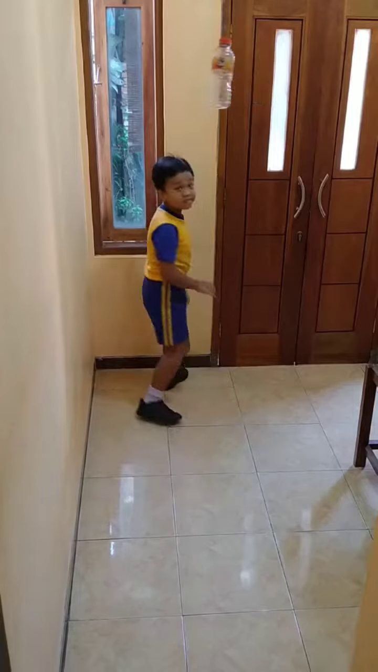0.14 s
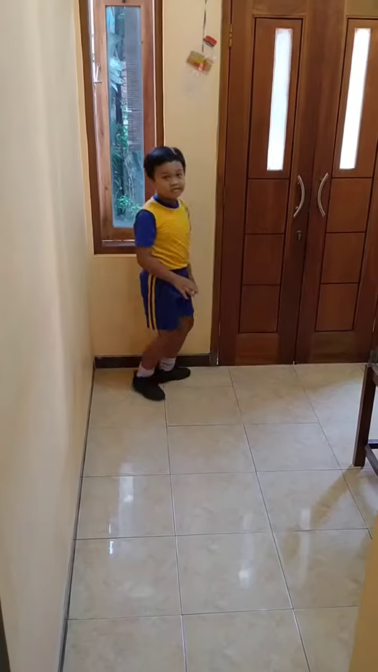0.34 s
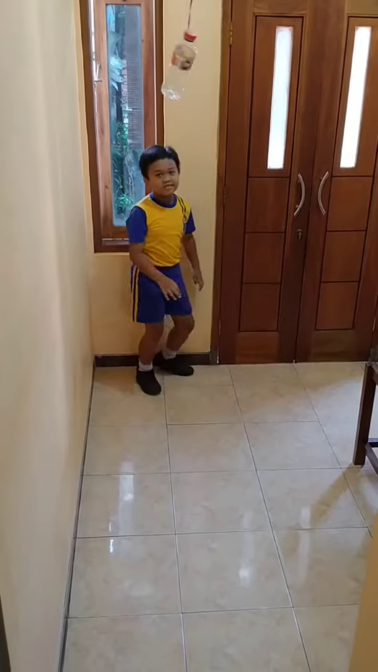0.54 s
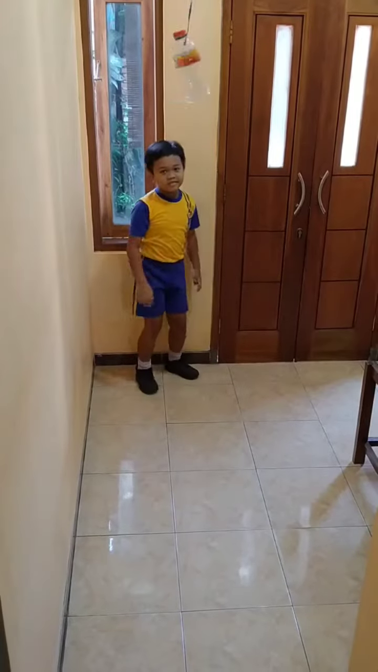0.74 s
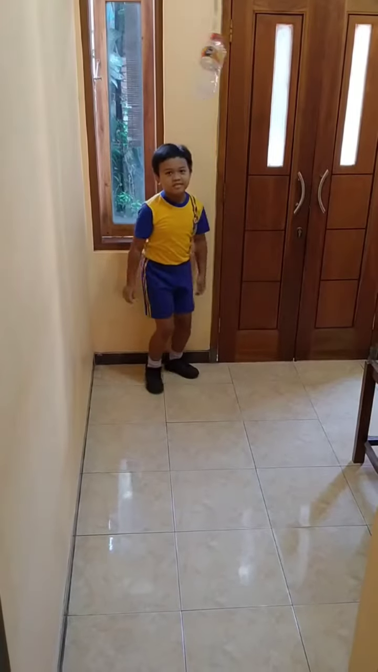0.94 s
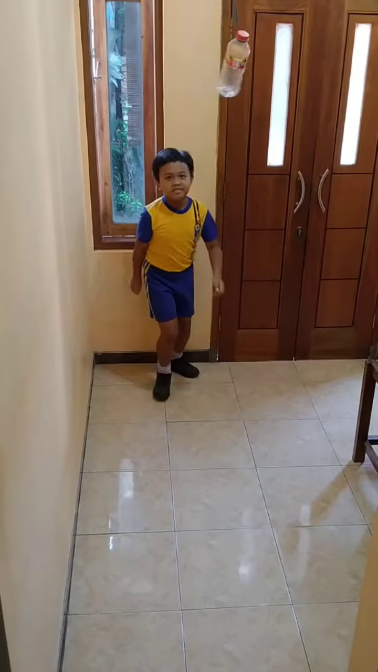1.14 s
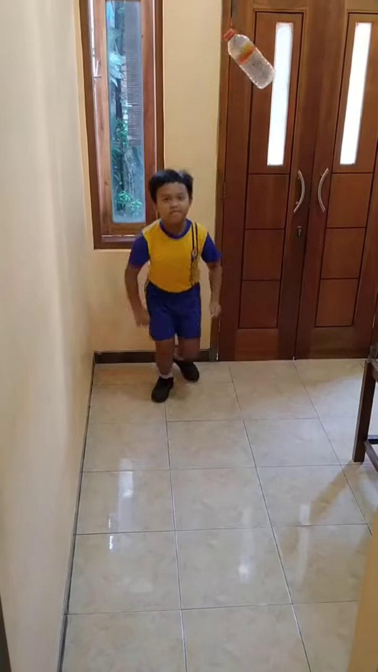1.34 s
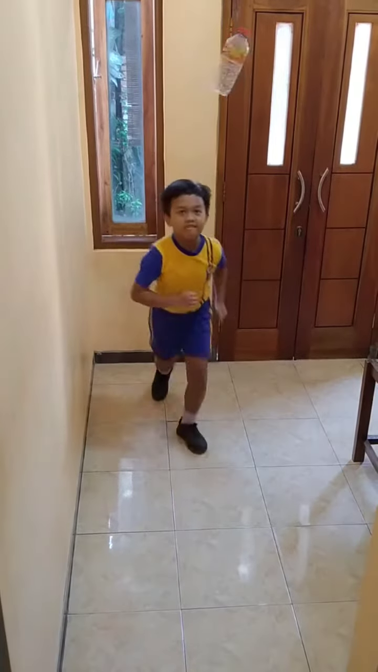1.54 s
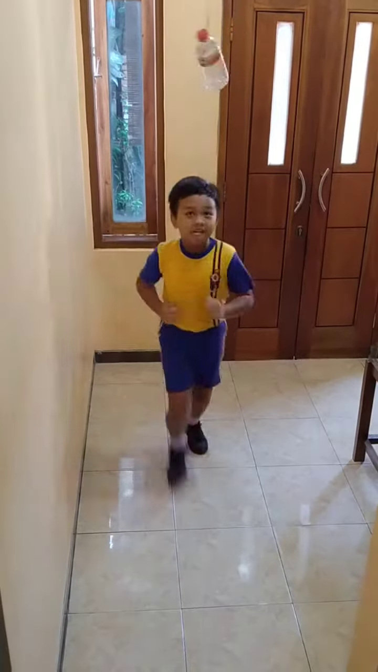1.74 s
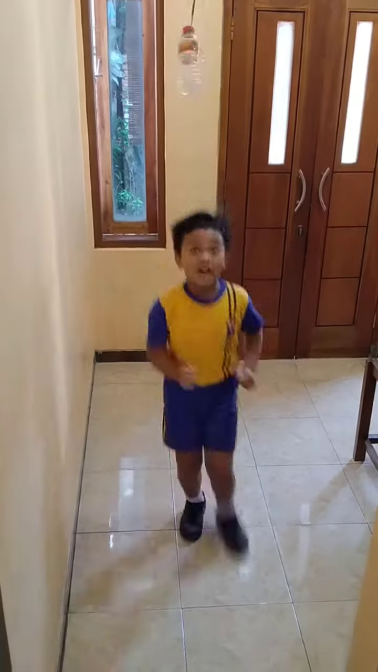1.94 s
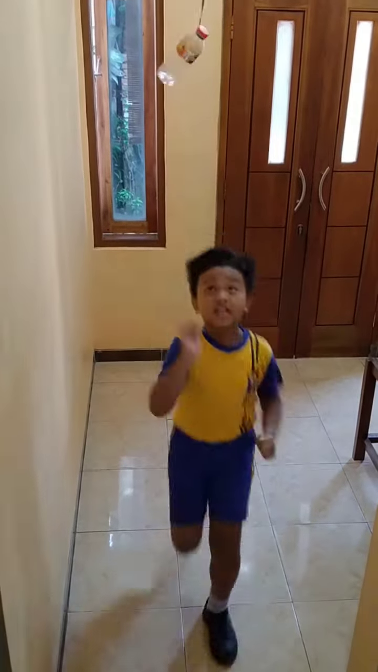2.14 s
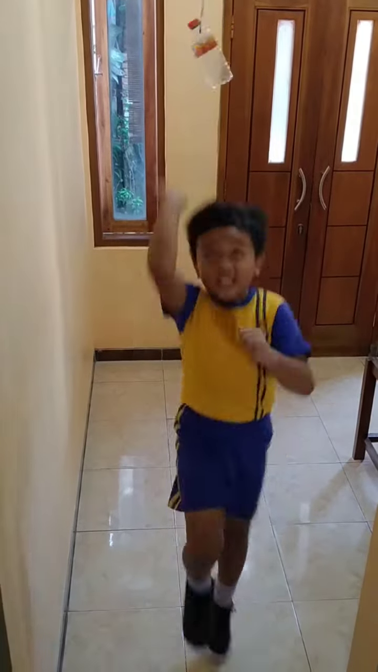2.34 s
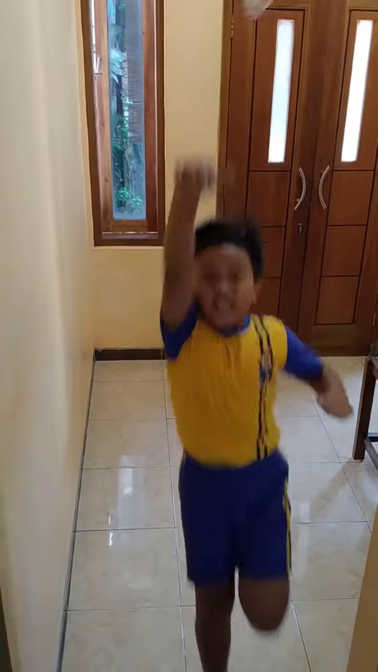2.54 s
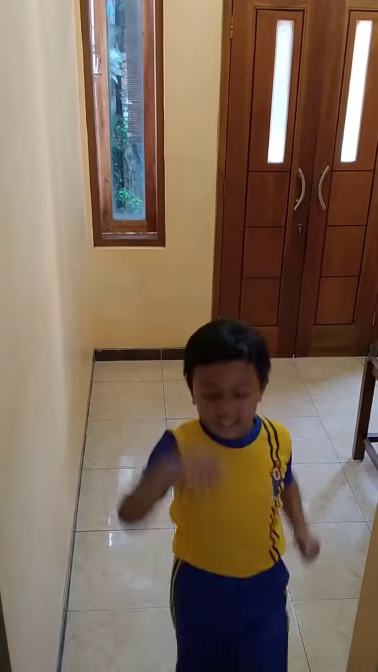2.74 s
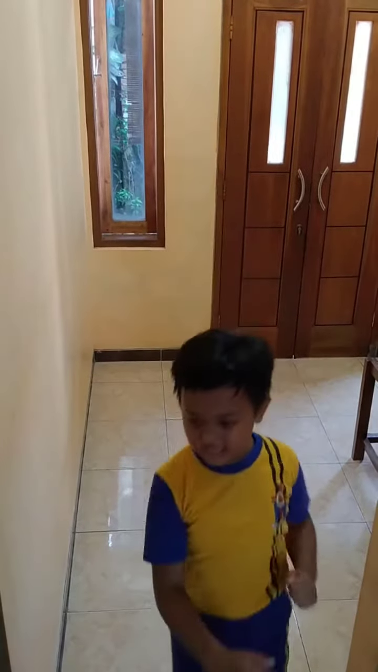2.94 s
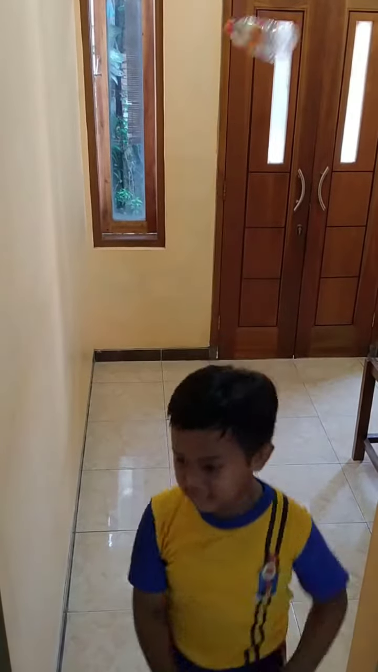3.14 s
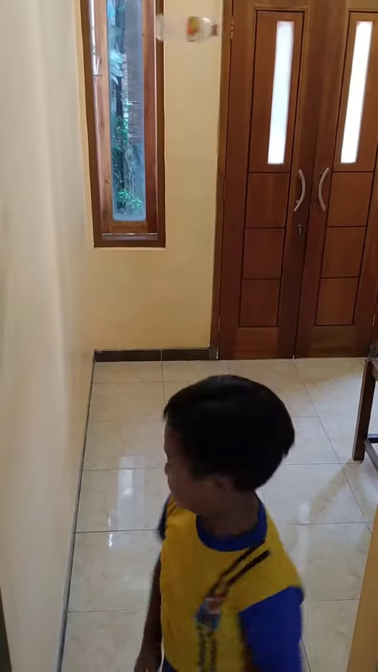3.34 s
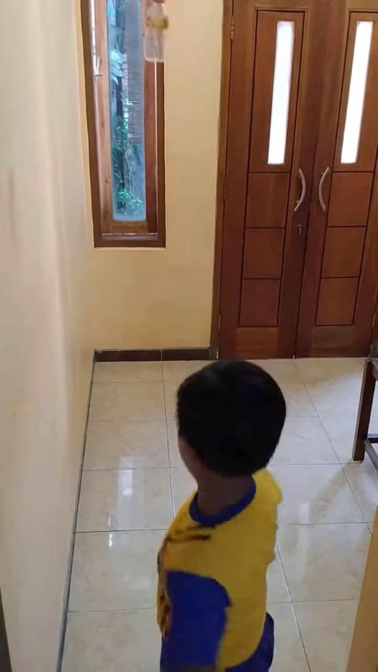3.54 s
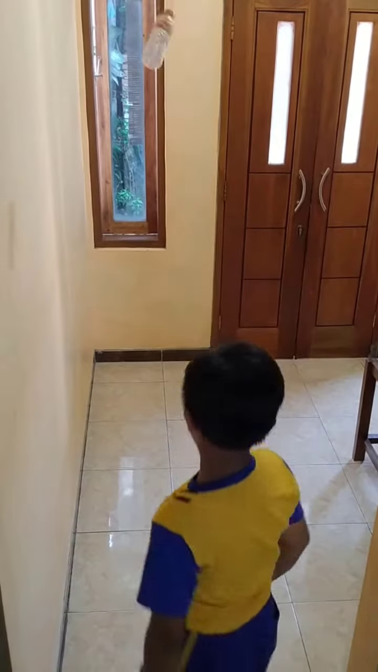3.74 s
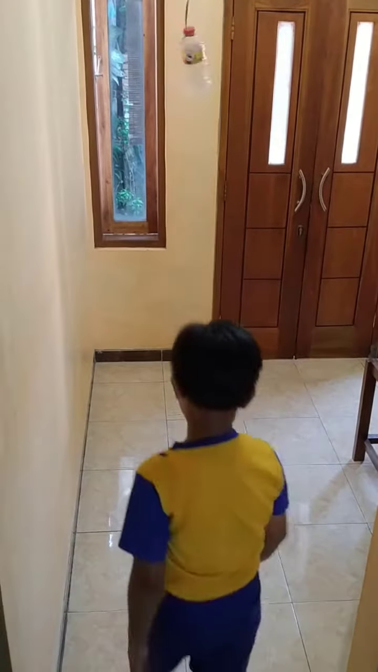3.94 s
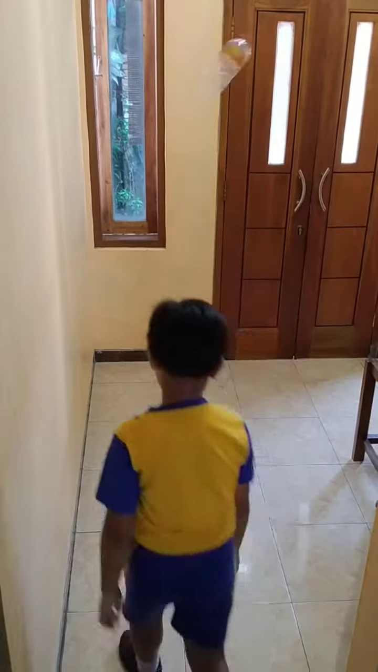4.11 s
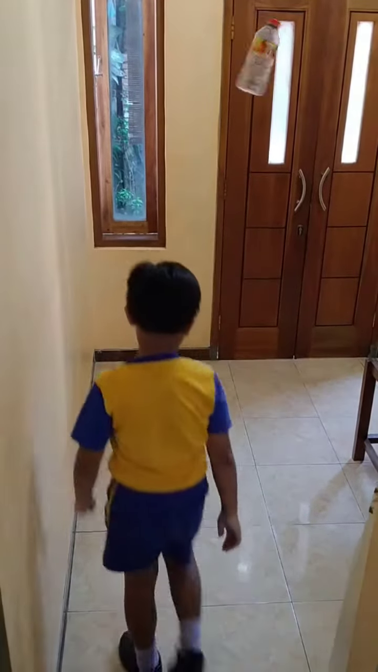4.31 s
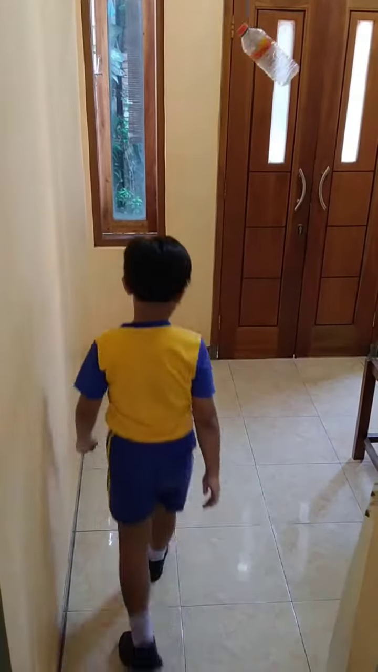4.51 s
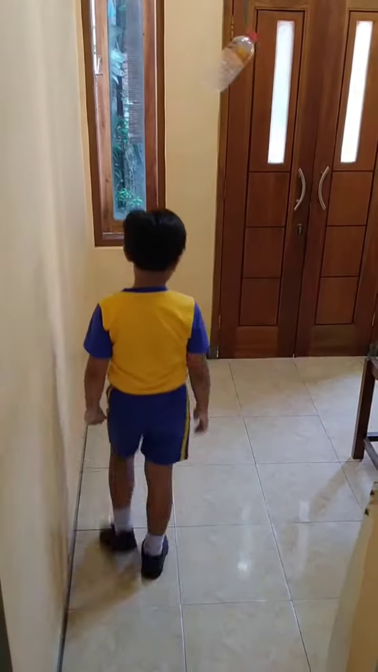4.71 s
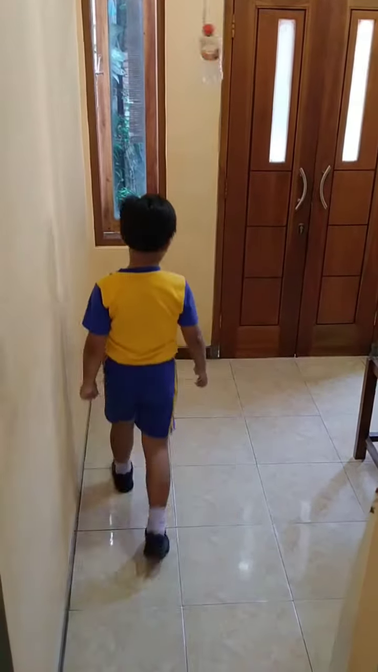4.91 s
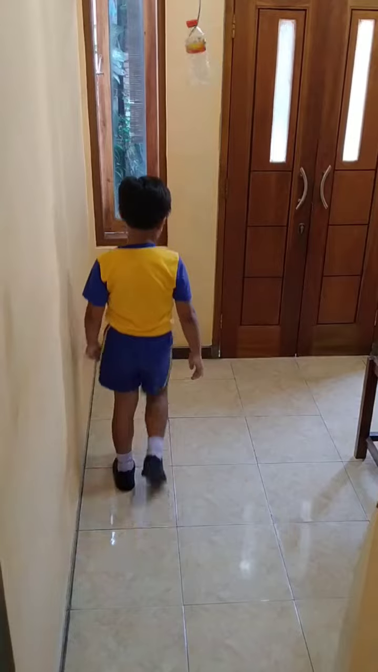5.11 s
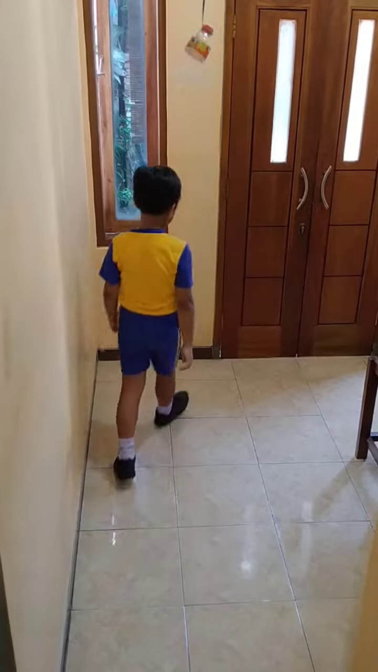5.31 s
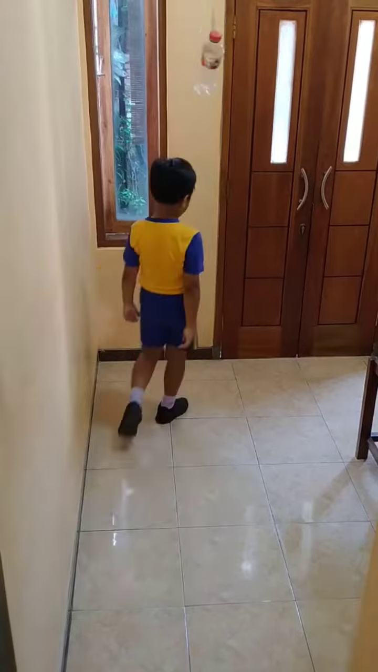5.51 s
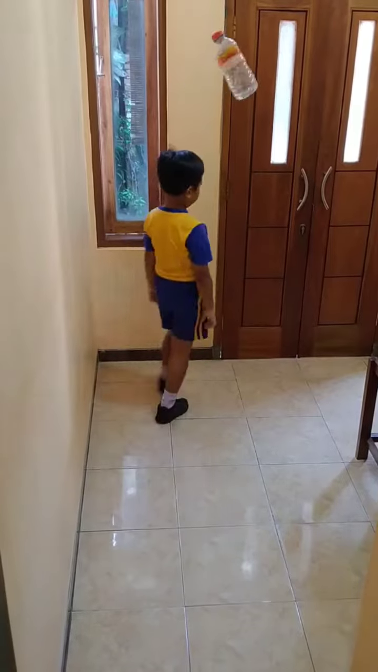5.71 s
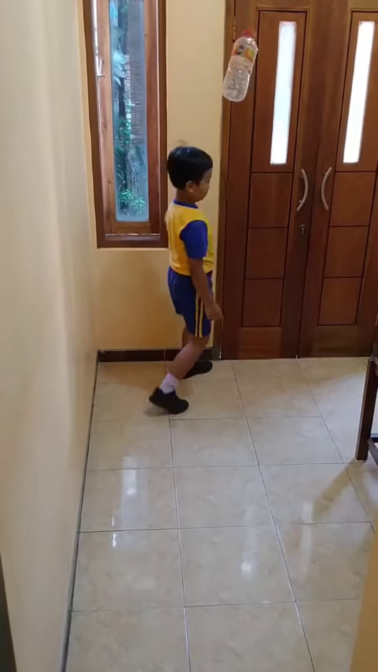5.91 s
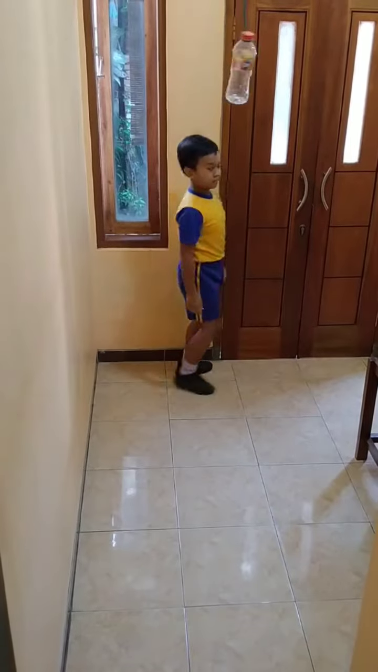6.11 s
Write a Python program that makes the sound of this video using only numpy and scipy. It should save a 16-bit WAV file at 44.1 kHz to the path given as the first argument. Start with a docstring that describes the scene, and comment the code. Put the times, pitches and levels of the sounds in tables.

```python
"""Tiled hall: a child walks, runs up, jumps and slaps a hanging plastic bottle while birds whistle.
Birds are gliding sines; steps are coloured noise slaps with a tile ring and a low thud; scuffs are
swelling noise. The bottle is a set of damped modes with noise cracks; ticks and thumps are damped sines.
Sparse random echoes give all but the thumps and the background a bright tail."""
import sys
import numpy as np
from scipy import signal
from scipy.io import wavfile
from scipy.ndimage import uniform_filter1d

SR = 44100
rng = np.random.default_rng(int(sys.argv[2]) if len(sys.argv) > 2 else 0)


def log_audio(samples):
    """Write samples as a 16-bit WAV file to the path given in sys.argv[1]."""
    # one column per channel
    frames = np.atleast_2d(samples).T
    # limit to full scale, then quantise
    limited = np.clip(frames, -1, 1)
    pcm = np.round(limited * 32767).astype(np.int16)
    wavfile.write(sys.argv[1], SR, pcm)


N = 276066

# colour of sole on tile: freq_hz, relative_density_db (per Hz)
SOLE_COLOUR = [(150, -18.5), (217, -6), (326, -21), (400, -4.5), (530, -15.5), (880, -10), (1900, -12),
               (3000, -13), (4500, -32), (6900, -57.5), (10900, -48), (15500, -53.5)]


def gain_of(db):
    """Decibels to amplitude."""
    return 10 ** (np.asarray(db) / 20)


def read(points, hz):
    """Interpolates a (Hz, value) table on a log frequency axis."""
    f, value = np.transpose(points)
    return np.interp(np.log(hz + 1), np.log(f + 1), value)


def add(mix, start_s, sound):
    """Adds a sound at start_s, cut at the end of the mix."""
    part = mix[round(start_s * SR):][:len(sound)]
    part += sound[:len(part)]


def coloured(x, points, tilt_db_per_octave=0):
    """Minimum-phase filter of unit energy: the phase follows from the log gain."""
    hz = abs(np.fft.fftfreq(4096, 1 / SR))
    octaves = np.log2(np.clip(hz, 200, 3000) / 1000)  # tilt pivots at 1 kHz, flat beyond the limits
    log_gain = np.log(gain_of(read(points, hz) + tilt_db_per_octave * octaves))
    spectrum = np.exp(np.conj(signal.hilbert(log_gain)))
    taps = np.fft.ifft(spectrum).real[:2048]
    return signal.fftconvolve(x, taps / np.linalg.norm(taps))


def burst(contact_s, noise):
    """A click of energy 1 that rises fast and dies over the contact time."""
    t = np.arange(len(noise)) / SR
    rise = 1 - np.exp(-t / 0.00079)
    x = noise * rise * np.exp(-t / max(contact_s, .0005))
    return x / np.linalg.norm(x)


def hall(x, build_s, t60_factor):
    """Sparse echoes of random sign and unit energy, each band dying at its own speed."""
    # hall decay: freq_hz, t60_s (before t60_factor)
    decay = [(80, .3), (250, .45), (700, .7), (1700, .9), (3000, .8), (5000, .7), (8000, .62), (16000, .4)]
    taps = np.zeros(SR)
    slots = np.arange(0, SR - 16, 16)
    taps[slots + rng.integers(0, 16, len(slots))] = rng.choice([-1., 1.], len(slots))
    hz, t, z = signal.stft(taps, SR, nperseg=256)
    fade_db = -60 * t / t60_factor / read(decay, hz)[:, None]
    tail = signal.istft(z * gain_of(fade_db), SR, nperseg=256)[1]
    late_s = np.arange(len(tail)) / SR
    tail = tail * (1 - np.exp(-late_s / build_s))  # echoes build up
    tail = tail * (1 + 0.47 * np.exp(-(late_s / 0.083) ** 4))  # the near walls answer strongest
    return signal.fftconvolve(x, tail / np.linalg.norm(tail))[:N]


def air():
    """Random short-time spectra: rumble and street wash swell slowly, in patches; the hiss stays even."""
    # quiet house and microphone hiss: freq_hz, relative_density_db (per Hz)
    colour = [(25, -48), (60, -22), (113, -11), (268, -17.5), (400, -25.5), (618, -22.5), (1090, -28),
              (1590, -24.5), (2650, -28), (3300, -27.5), (4080, -38), (6000, -44), (8500, -48.5),
              (11000, -39.5), (13000, -41), (15700, -35.5)]
    # background swell: time_s, rumble_db, street_db
    swell = [(0, -68, -66.5), (.25, -55.5, -64), (.6, -63, -66), (1.2, -63.5, -68), (1.501, -66, -58),
             (1.9, -61, -65.5), (2.3, -63, -66.5), (3.3, -64.5, -68.5), (3.7, -65.5, -68.5),
             (4.2, -66.5, -69), (4.7, -63.5, -63.5), (5.199, -64, -61.5), (5.9, -66, -66),
             (6.26, -65, -65.5)]
    hiss_db = -77
    frames, hz = N // 256 + 5, np.fft.rfftfreq(1024, 1 / SR)[:, None]
    real, imag, patches = rng.standard_normal((frames, 513, 3)).T
    patches = uniform_filter1d(uniform_filter1d(patches, 8, 0), 12, 1)  # over frequency, then time
    low = 1 / (1 + (hz / 330) ** 4)
    high = 1 / (1 + (5000 / (hz + 1)) ** 4)
    z = (real + 1j * imag) * gain_of(read(colour, hz) + 5.3 * patches * (3.5 - high))
    time_s, rumble_db, street_db = np.transpose(swell)
    t, out = np.arange(N) / SR, 0
    rumble = (low, np.interp(t, time_s, rumble_db))
    street = (1 - low - high, np.interp(t, time_s, street_db))
    for share, level_db in (rumble, street, (high, hiss_db)):
        layer = signal.istft(z * share, nperseg=1024, noverlap=768)[1][:N]
        out = out + gain_of(level_db) * layer / layer.std()
    return out


def whistle(length_s, start_hz, end_hz, level_db, overtone_db, husk=1):
    """A gliding sine with random pitch waver, level flutter and three overtones."""
    u = np.linspace(0, 1, round(np.clip(length_s, .01, .19) * SR))
    hz = start_hz + (end_hz - start_hz) * u ** 0.77  # fast at first, then settling
    noise = rng.standard_normal((2, 9000))
    smooth = signal.oaconvolve(noise, np.hanning(200)[None] / 9)
    waver, flutter = smooth[:, 200:200 + len(u)]
    phase = 2 * np.pi * np.cumsum(hz + (35 + .003 * hz) * husk * waver) / SR
    overtones = np.sin(2 * phase) + 0.25 * np.sin(3 * phase) + 0.086 * np.sin(4 * phase)
    tone = (1 + .3 * flutter) * (np.sin(phase) + gain_of(overtone_db) * overtones)
    return gain_of(level_db) * tone * signal.windows.tukey(len(u), .4)


def birds():
    """Single notes, repeated figures and reedy notes, heard mostly as echo."""
    # single whistled notes: start_s, length_s, start_hz, end_hz, level_db (before the echo mix)
    notes = [(0, 0.056, 1577, 1535, -68), (0, 0.012, 6700, 6440, -62), (.013, 0.075, 5180, 4500, -51.5),
             (.262, 0.079, 6200, 5380, -70.5), (.591, .064, 3480, 3296, -57),
             (.617, 0.11, 6200, 3890, -56.5), (.686, 0.037, 2780, 2750, -56),
             (.735, 0.062, 3500, 2003, -38.5), (.795, 0.032, 2160, 2310, -46.5),
             (.942, 0.039, 1777, 2155, -53.5), (.983, 0.054, 2134, 2530, -37),
             (1.042, 0.06, 2932, 2910, -32.5), (1.107, 0.023, 2753, 2140, -34),
             (1.245, 0.03, 2300, 1556, -49), (1.277, 0.045, 2426, 2466, -34.5),
             (1.342, 0.055, 3103, 2611, -33), (1.396, 0.037, 2600, 2373, -36),
             (1.507, 0.029, 2440, 1750, -43.5), (1.547, 0.063, 2300, 2347, -39),
             (1.655, 0.03, 2780, 2993, -30.5), (4.73, 0.041, 2747, 2326, -30.5),
             (4.735, 0.08, 2775, 3897, -29.5), (4.77, 0.055, 3000, 3275, -35),
             (5.345, .07, 2533, 3168, -28.5), (5.374, 0.045, 2826, 3720, -28),
             (5.453, 0.11, 3040, 2627, -51.5), (1.538, 0.16, 4470, 4316, -68.5),
             (1.658, 0.017, 3100, 3640, -47.5), (1.675, 0.054, 3720, 3780, -63),
             (1.705, .051, 2007, 2374, -41), (3.315, 0.086, 2503, 2535, -69),
             (3.34, 0.1, 4330, 4420, -57.5), (3.79, 0.041, 2580, 2670, -71), (3.91, 0.035, 2850, 3050, -75),
             (3.509, 0.028, 3400, 3800, -57), (4.776, 0.09, 3900, 4380, -47), (4.83, .045, 3598, 2187, -30),
             (4.911, 0.051, 3210, 2360, -33), (4.976, 0.075, 2600, 3374, -37),
             (5.04, 0.031, 2660, 2500, -35.5), (5.075, 0.058, 2700, 3280, -40),
             (5.15, 0.029, 3330, 2495, -37), (5.11, 0.059, 3250, 3280, -48), (5.25, 0.069, 3190, 3030, -59),
             (5.295, 0.058, 3210, 3136, -35), (6.168, 0.016, 2900, 3340, -62)]
    # notes rich in overtones: same columns
    reedy_notes = [(1.31, 0.071, 2430, 2550, -59), (1.396, 0.053, 2540, 2490, -49.5),
                   (1.5, .069, 2498, 2485, -49), (1.734, 0.041, 2440, 2510, -48.5),
                   (1.802, 0.09, 2523, 2670, -48.5)]
    # repeated figures, by name: delay_s, length_s, start_hz, end_hz, relative_db (before stretch, pitch)
    figures = {"flick": [(0, 0.024, 4130, 1996, 2), (.018, 0.053, 2022, 1788, -7)],
               "far": [(0, 0.043, 2750, 2704, 2), (.002, 0.069, 3760, 3943, -5.5),
               (.03, .075, 2500, 1593, -2), (.105, 0.048, 1592, 1523, -4)],
               "peep": [(0, 0.13, 6100, 8600, 0.5)]}
    # figures sung: start_s, figure, level_db, pitch_factor, time_stretch
    song = [(0.122, "peep", -71.5, 0.95, 0.74), (.39, "peep", -78, 0.99, 0.63),
            (.777, "peep", -73.5, 0.97, 0.52), (4.676, "flick", -40, 1.01, 0.94),
            (5.298, "flick", -36, .98, 0.9), (5.499, "far", -54.5, 1.07, 0.91),
            (5.737, "far", -48.5, 1.028, 0.97), (6.034, "far", -56, 0.99, 0.75)]
    clear_db, reedy_db = -53.5, -13.5  # overtones relative to the note
    sung = np.zeros(N)
    for table, overtone_db, husk in ((notes, clear_db, 1), (reedy_notes, reedy_db, 2.5)):
        for start_s, *note in table:
            add(sung, max(start_s, 0), whistle(*note, overtone_db, husk))
    for start_s, figure, level_db, pitch, stretch in song:
        for delay_s, length_s, start_hz, end_hz, relative_db in figures[figure]:
            note = whistle(length_s * stretch, start_hz * pitch, end_hz * pitch,
                           level_db + relative_db, clear_db)
            add(sung, start_s + delay_s * stretch, note)
    heard = gain_of(-10) * sung
    heard = heard + hall(sung, 0.0075, 0.78)
    # loud notes raise a faint rasp near 11 kHz
    rasp = np.sqrt(abs(uniform_filter1d(heard ** 2, 600))) * rng.standard_normal(N)
    band = signal.butter(2, [9800, 12500], "band", fs=SR, output="sos")
    return heard + gain_of(-39.5) * signal.sosfilt(band, rasp)


def steps():
    """The sole slaps a tile, which rings briefly; the heel sends a short low thud through the slab."""
    # shoe contacts: start_s, slap_db (gain of slap and ring), thud_db, tile_ring_hz, tilt_db_per_octave
    contacts = [(0.161, -50, -60, 676, -1), (.475, -35.5, -48, 730, -4.5), (.794, -36.5, -43, 406, -6),
                (1.324, -46.5, -52, 463, -0.5), (1.653, -38.5, -72, 1180, -3.7), (1.673, -43, -70, 760, 11),
                (1.964, -42.5, -54, 810, -5), (1.988, -29, -38.5, 382, 1), (2.215, -34, -48.5, 1653, -1.7),
                (2.733, -26, -40.5, 306, 2.5), (4.189, -46.5, -70, 680, -2), (4.484, -36, -73, 512, 0.5),
                (4.514, -32.5, -52, 1125, -2), (4.849, -40, -50, 646, 1.5), (4.907, -37.5, -48.5, 271, 5.5),
                (5.037, -37.5, -50.5, 703, 0), (5.273, -49, -70, 713, -9), (5.351, -37.5, -46.5, 830, -3.5),
                (5.84, -47.5, -48, 375, 9), (5.978, -41, -56, 422, -4)]
    # distance of the shoes, setting the echo share: time_s, distance_m
    walk = [(0, 4.2), (.6, 3.6), (1.5, 5.5), (2.3, 3.4), (2.75, 1.6), (3.3, 1.6), (4.0, 3.0), (6.26, 5.8)]
    even_m = 3.0  # distance at which the slap is sent equally to echo and direct sound
    slab_hz, spread_octaves = 165, .2  # thud pitch varies at random around slab_hz
    near, echoed, t = np.zeros(N), np.zeros(N), np.arange(4000) / SR
    for start_s, slap_db, thud_db, ring_hz, tilt_db in contacts:
        thud_hz = slab_hz * 2 ** (spread_octaves * rng.uniform(-1, 1))
        slap = 6 * coloured(burst(0.0029, rng.standard_normal(1953)), SOLE_COLOUR, tilt_db)
        slap = slap + 0.76 * np.sin(2 * np.pi * ring_hz * t) * np.exp(-t / 0.0029)
        slap = gain_of(slap_db) * slap
        thud_envelope = t / 0.0018 * np.exp(1 - t / 0.0032)
        thud = gain_of(thud_db) * np.sin(2 * np.pi * thud_hz * t) * thud_envelope
        add(near, start_s, slap + thud)
        echo_share = np.interp(start_s, *np.transpose(walk)) / even_m
        add(echoed, start_s, echo_share * (slap + 0.33 * thud))
    return near + hall(echoed, 0.0055, 0.62)


def scuffs():
    """Rubber drags on glaze: noise in the colour of the sole that swells until the shoe stops."""
    # drags: end_s, length_s, level_db (before the echo is added)
    drags = [(0.256, 0.038, -61.5), (2.213, 0.062, -53.5), (4.084, 0.02, -61), (4.531, 0.044, -50.5)]
    out = np.zeros(N)
    for end_s, length_s, level_db in drags:
        swell = np.linspace(0, 1, round(max(length_s, .01) * SR)) ** 1.4
        drag = coloured(swell * rng.standard_normal(len(swell)), SOLE_COLOUR, tilt_db_per_octave=1)
        add(out, end_s - length_s, gain_of(level_db) * drag)
    return out + 1.5 * hall(out, 0.0038, 0.38)


def thumps():
    """A short low push, a damped sine, with a dull noise click and no echo."""
    # dry thumps close to the microphone: start_s, level_db, pitch_hz
    pushes = [(0.312, -40.5, 193), (0.392, -49, 165), (0.406, -41, 175), (3.103, -41.5, 133),
              (3.167, -40.5, 202), (3.174, -36.5, 210), (3.184, -39, 124)]
    decay_s, click_db = 0.0036, 3
    out, t = np.zeros(N), np.arange(2000) / SR
    dull = signal.butter(2, 1300, fs=SR, output="sos")
    for start_s, level_db, pitch_hz in pushes:
        push = np.sin(2 * np.pi * pitch_hz * t) * t / decay_s * np.exp(1 - t / decay_s)
        click = signal.sosfilt(dull, rng.standard_normal(len(t))) * np.exp(-t / 0.0027)
        add(out, start_s, gain_of(level_db) * (push + gain_of(click_db) * click))
    return out


def bottle():
    """The shell cracks and crinkles, and the hollow body rings in a few modes."""
    # knocks: start_s, ring_db, crack_db (before the common crack gains), contact_s, treble_edge_hz
    knocks = [(2.571, -61, -19.5, 0.0087, 13900), (2.579, -17.5, -25, 0.054, 14000),
              (2.694, -30.5, -58, 0.0056, 5000), (2.708, -25.5, -32, 0.011, 12100),
              (2.779, -32, -28, 0.0024, 3180)]
    # modes of the hollow body: freq_hz, relative_db, t60_s
    modes = [(171, -10, 0.17), (242.2, 3, 0.25), (301.4, -3, 0.19), (473.8, -6.5, 0.26), (684, -5, 0.049),
             (873, -10.5, 0.098), (1730, -29, 1), (3010, -20, .06)]
    # colour of the cracking shell: freq_hz, relative_density_db (per Hz)
    crack_colour = [(300, -25), (460, -11), (700, -3), (1120, -15.5), (1590, -6.5), (2150, -19.5),
                    (2920, -12), (4500, -29), (6500, -43.5), (10600, -36.5), (15500, -35)]
    # the dented shell crackles back: level_db (before the common crack gain), half_fade_s, snaps_per_s
    crinkle = (-57.5, 0.1, 3700)
    rings, cracks, t = np.zeros(N), np.zeros(N), np.arange(SR // 2) / SR
    ring = sum(gain_of(db - 60 * t / t60_s) * np.sin(2 * np.pi * hz * t) for hz, db, t60_s in modes)
    for start_s, ring_db, crack_db, contact_s, edge_hz in knocks:
        add(rings, start_s, gain_of(ring_db) * ring * (1 - np.exp(-t / 0.0039)))
        crack = coloured(burst(contact_s, rng.standard_normal(4000)), crack_colour)
        treble_cut = signal.butter(2, min(edge_hz, 16000), fs=SR, output="sos")  # own edge per knock
        add(cracks, start_s, 15 * gain_of(crack_db) * signal.sosfilt(treble_cut, crack))
    crinkle_db, half_fade_s, snaps_per_s = crinkle
    snaps = rng.standard_normal(len(t)) * (rng.random(len(t)) < snaps_per_s / SR)
    snaps = snaps * np.sqrt(SR / snaps_per_s)  # unit power at any rate
    fading = snaps * np.exp(-(t / (2 * half_fade_s)) ** 2)
    first_knock_s = knocks[0][0]
    add(cracks, first_knock_s, gain_of(crinkle_db) * coloured(fading, crack_colour, 1.1))
    faint_rings = gain_of(-9) * rings  # the rings are sent to the hall more faintly
    return rings + gain_of(1.0) * cracks + hall(cracks + faint_rings, 0.0014, 0.76)


def ticks():
    """Each tick is one short, quickly damped ring with a fainter echo."""
    # small ticks near the microphone: start_s, level_db, pitch_hz, ring_s
    rings = [(3.015, -49, 3470, 0.00099), (3.058, -54, 2770, 0.0035), (3.175, -53, 2650, 0.00053),
             (3.598, -52, 2840, 0.0028)]
    out, t = np.zeros(N), np.arange(2000) / SR
    for start_s, level_db, pitch_hz, ring_s in rings:
        envelope = t / ring_s * np.exp(1 - t / ring_s)
        add(out, start_s, gain_of(level_db) * np.sin(2 * np.pi * pitch_hz * t) * envelope)
    return out + gain_of(-7) * hall(out, .005, 1.0)


def scene():
    """All sources at one microphone."""
    return (birds() + steps() + scuffs() + thumps() + bottle() + ticks() + air())[None]


def record(dry):
    """The level dips briefly; then a bass cut and a band limit."""
    # brief level dip: width_s, depth_db
    dip = (0.005, -20)
    width_s, depth_db = dip
    dip_s, bass_cut_hz, band_edge_hz = 4.049, 75, 15850
    dip_shape = np.exp(-((np.arange(N) / SR - dip_s) / width_s) ** 4)
    dipped = dry * gain_of(depth_db * dip_shape)
    thin = signal.sosfilt(signal.butter(4, bass_cut_hz, "high", fs=SR, output="sos"), dipped)
    band_limit = signal.firwin(511, band_edge_hz, window=("kaiser", 9), fs=SR)
    return signal.oaconvolve(thin, band_limit[None], "same")


dry = scene()
out = record(dry)
log_audio(out)
```